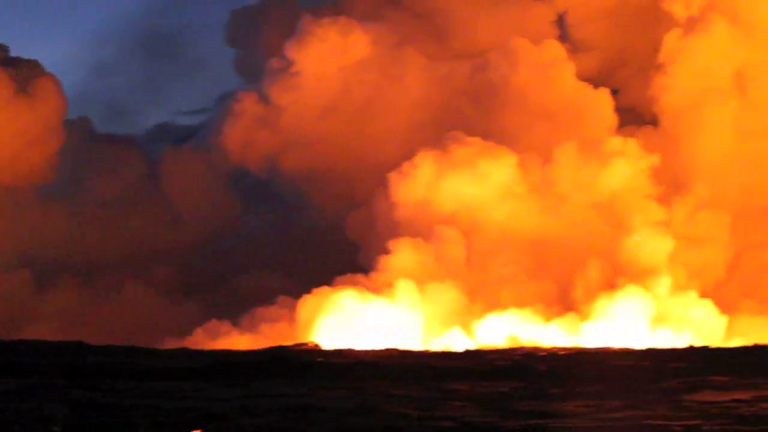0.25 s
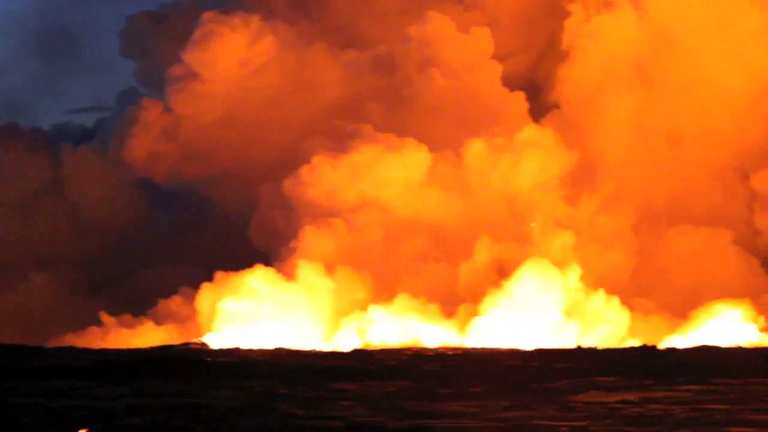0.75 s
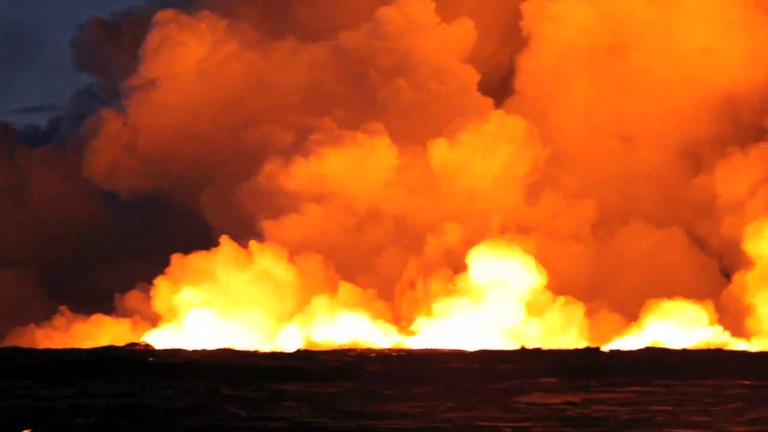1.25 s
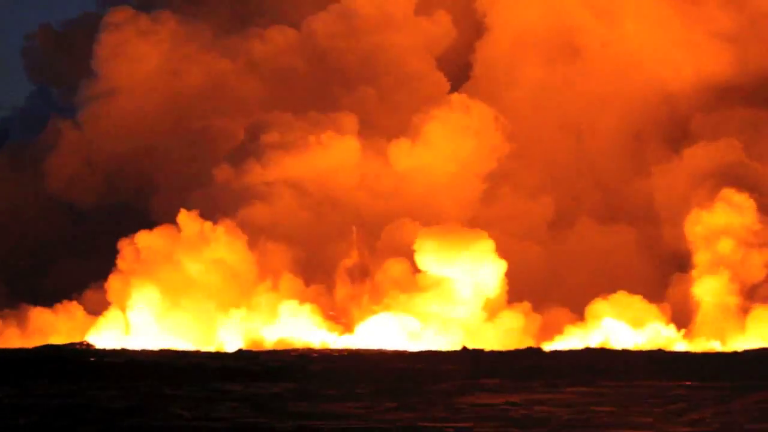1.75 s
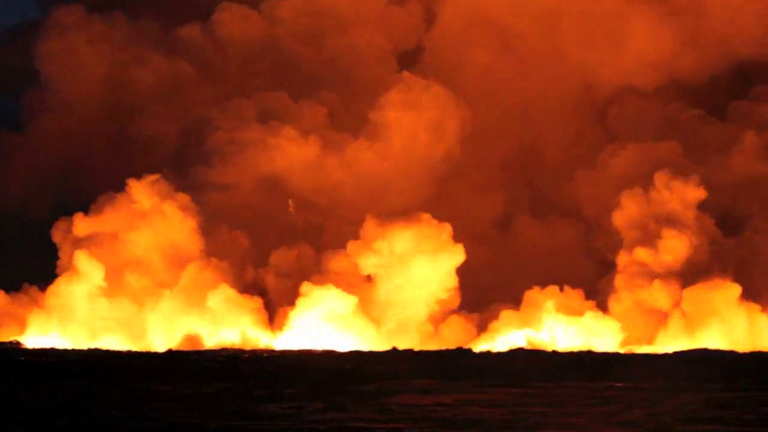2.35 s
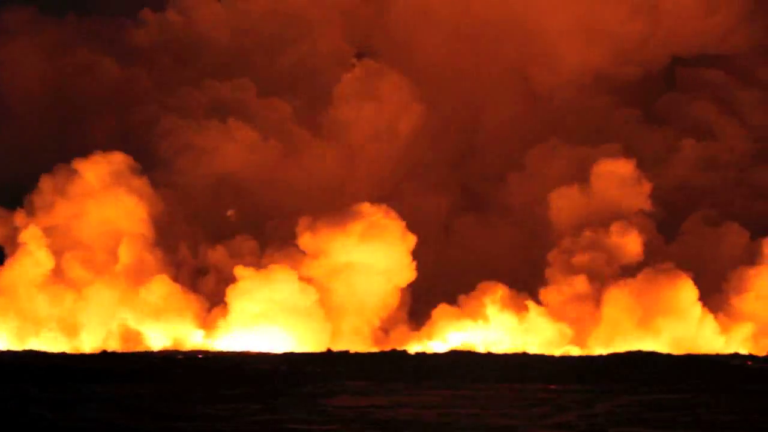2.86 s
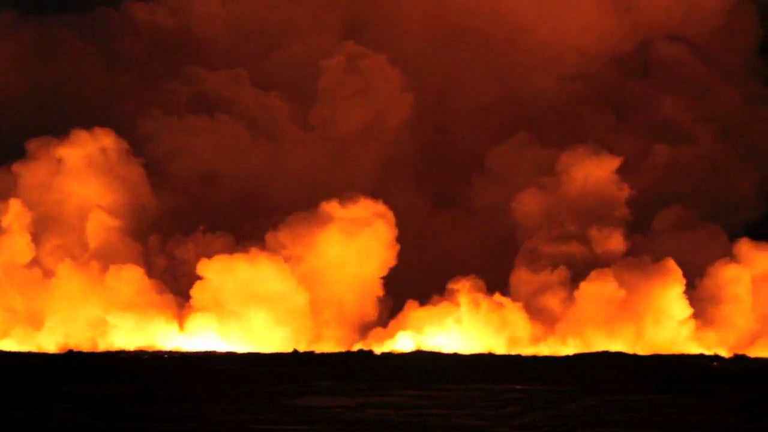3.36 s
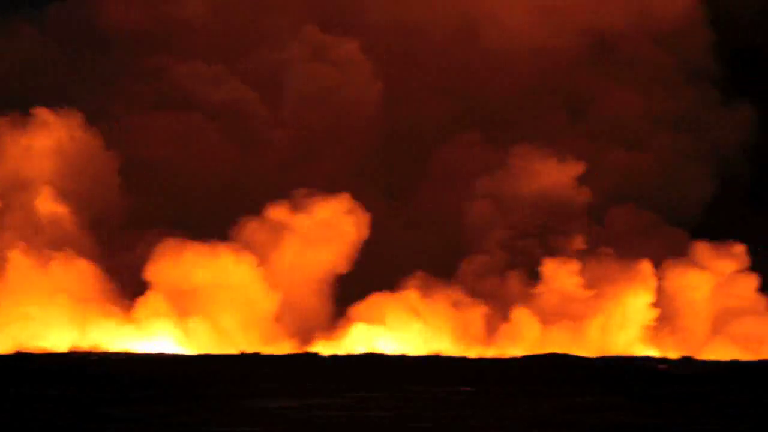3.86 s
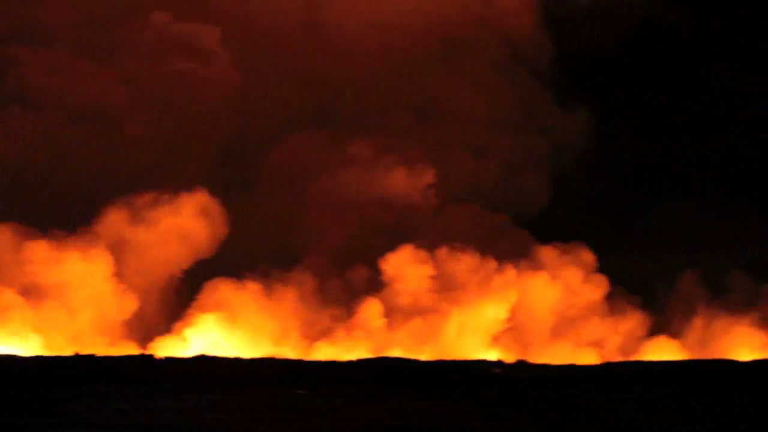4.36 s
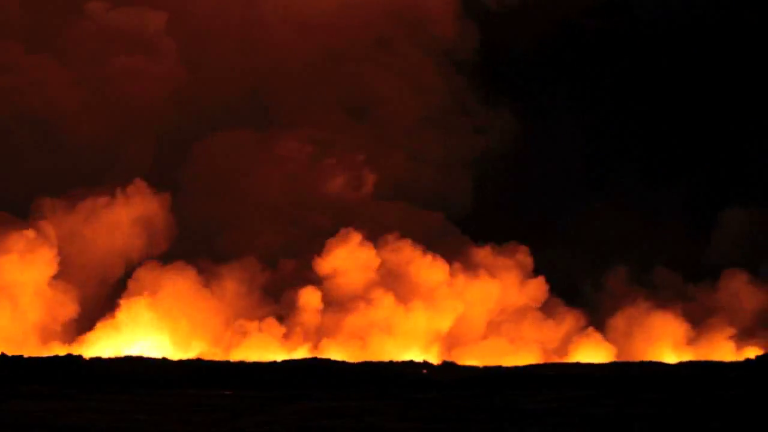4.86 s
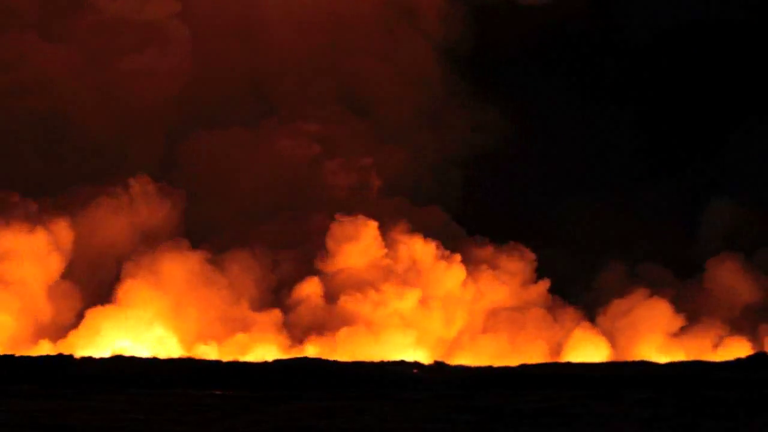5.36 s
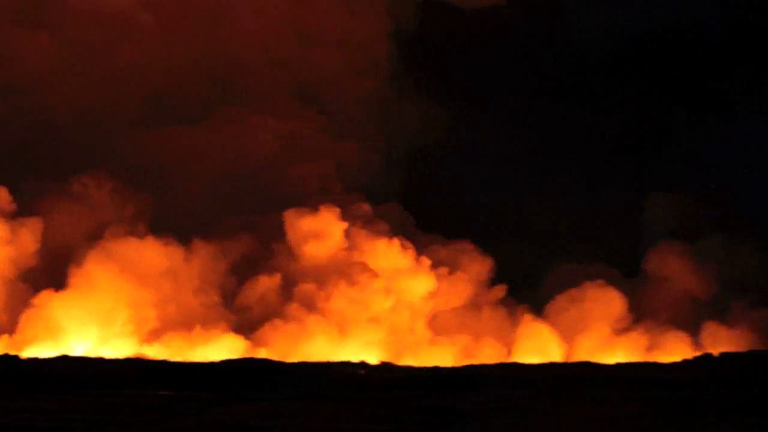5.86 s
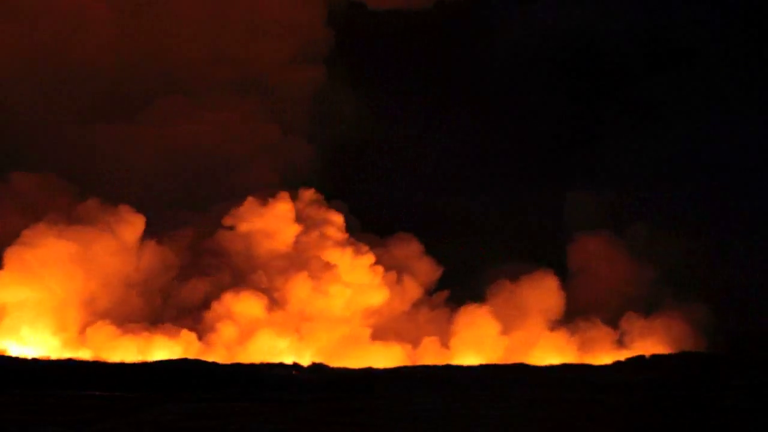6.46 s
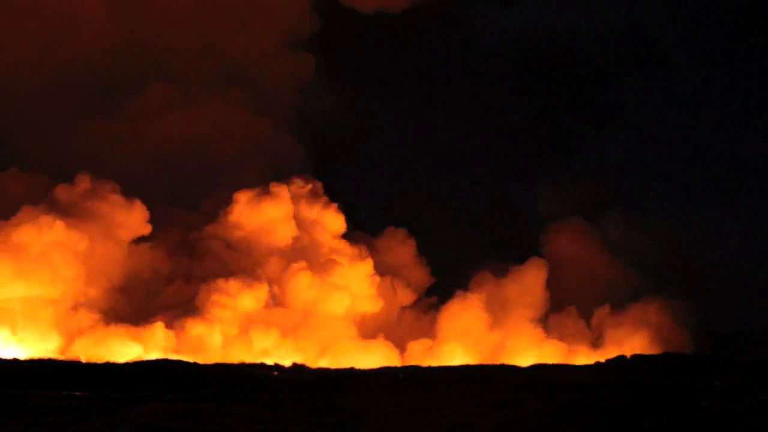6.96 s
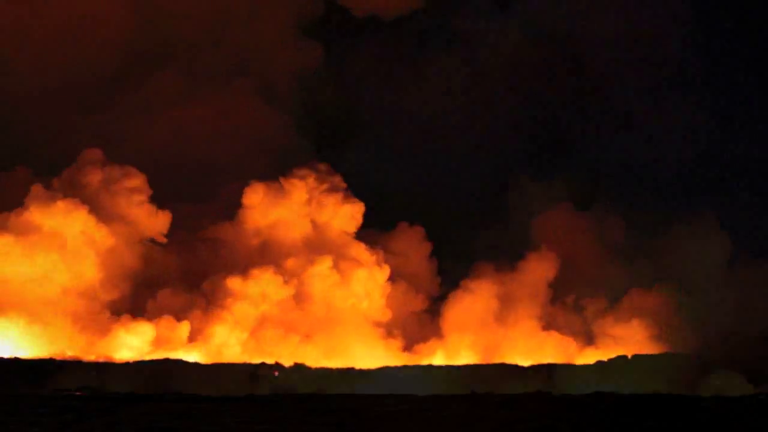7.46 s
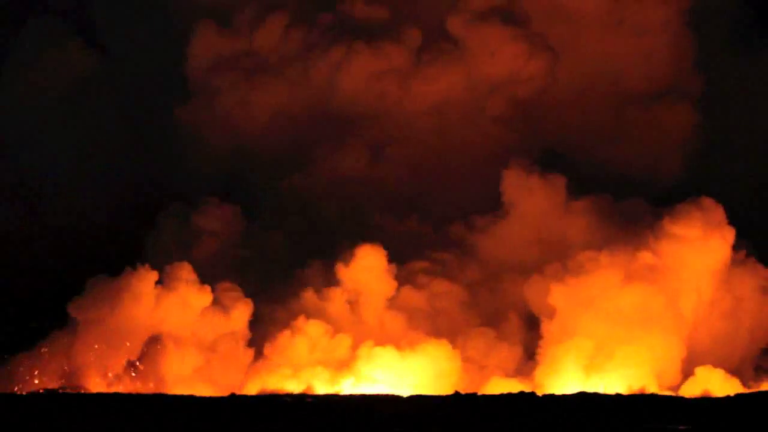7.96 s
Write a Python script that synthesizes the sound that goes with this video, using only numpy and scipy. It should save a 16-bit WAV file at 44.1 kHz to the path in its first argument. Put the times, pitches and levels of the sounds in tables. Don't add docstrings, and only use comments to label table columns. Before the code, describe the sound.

Molten lava pours into the sea at night, steam roaring and seething under constant sharp rock cracks, fine crackle and a few deep thudding blasts.

```python
import sys
import numpy as np
from scipy import signal
from scipy.fft import rfft, irfft, next_fast_len
from scipy.io import wavfile
from scipy.ndimage import uniform_filter1d

SR = 44100
rng = np.random.default_rng(int(sys.argv[2]) if len(sys.argv) > 2 else 0)


def file_out(sig):
    cols = np.atleast_2d(sig).T
    lim = np.clip(cols, -1, 1)
    pcm = np.round(lim * 32767).astype(np.int16)
    wavfile.write(sys.argv[1], SR, pcm)


def ratio_of_db(decibels):
    return 10 ** (np.asarray(decibels, float) / 20)


N = 362061

# (t/s, gain)
VOLUME = [
    (0, 1),
    (7.5, 1),
    (7.9, 1.03),
    (8.0, .568),
    (8.21, .568),
]
SPLINTER_RATTLE_DB = -28.5


def unit(x):
    return x / np.sqrt(np.mean(x ** 2))


def curve(s, value):
    return np.interp(np.arange(N) / SR, s, value)


def colour(x, table):
    hz, db = np.transpose(table)
    size = next_fast_len(N)
    f = np.maximum(np.arange(size // 2 + 1) * SR / size, 1)
    gain = ratio_of_db(np.interp(np.log(f), np.log(hz), db))
    return unit(irfft(rfft(x, size) * gain, size)[:N])


def walk(rate):
    k = int(SR / rate)
    held = np.repeat(rng.standard_normal(N // k + 1), k)[:N]
    slewed = uniform_filter1d(uniform_filter1d(held, k), k)
    return unit(slewed - uniform_filter1d(slewed, 4 * k))


def add(out, s, sound):
    i = max(int(s * SR), 0)
    out[..., i:i + sound.shape[-1]] += sound[..., :max(N - i, 0)]


def swells(s, db, length, rise=0.91, fall=0.95):
    t = np.arange(0, N + 256, 256) / SR - s[:, None]
    width = length[:, None] * np.where(t < 0, rise, fall)
    bells = ratio_of_db(2 * db)[:, None] * np.exp(-(t / width) ** 2)
    return curve(t[0] + s[0], bells.sum(axis=0))


def seething(table, flicker_db, grains, grain_db, grain_share, count):
    hits = rng.random(N) < grains / SR
    size = ratio_of_db(grain_db * np.minimum(rng.exponential(size=N), 3.2))
    bursts = hits * rng.standard_normal(N) * size
    share = np.clip(grain_share, 0, 1)
    source = np.sqrt(1 - share) * rng.standard_normal(N) + np.sqrt(share) * unit(bursts)
    return unit(colour(source, table) * ratio_of_db(flicker_db * walk(count)))


def boiling():
    # (f/Hz, level/dB)
    rumble_tone = [(20, -21), (35, -56), (50, 3.5), (100, 1), (200, -1), (300, -12), (600, -50)]
    roar_tone = [(100, -16.5), (200, -5.5), (300, -1.5), (450, -3.5), (580, -1.5), (800, -2), (930, -8),
                 (1300, -16.5), (3000, -53)]
    seethe_tone = [(500, -15.5), (950, -4.5), (1400, 2), (1700, -1), (2100, -8), (3500, -34.5)]
    spray_tone = [(1500, -22), (2100, -2), (2700, 0), (3200, -7), (4300, -11), (6500, -20), (12000, -35)]
    # (t/s, roar level/dB)
    flow = [(0, -30), (.6, -30), (1.35, -32.5), (1.55, -30.5), (1.85, -34), (2.25, -31), (2.7, -33),
            (3.09, -29.5), (3.65, -35.5), (3.9, -34.5), (4.09, -31), (4.82, -31), (5.2, -32), (5.6, -29.5),
            (6.0, -32.5), (6.5, -33.5), (7.4, -32), (8.21, -34)]
    # (t/s, seething level/dB, length/s, spray share/dB)
    waves = [(0.0, -42, 0.15, -9), (0.534, -40.5, 0.23, -5), (0.782, -41.5, 0.14, -5),
             (2.048, -39.5, 0.22, -6.5), (2.538, -38, 0.18, -4), (2.82, -38, 0.12, -9.5),
             (3.07, -35, 0.16, -4), (3.418, -38.5, 0.15, -14), (4.253, -34, 0.14, -5.5),
             (4.5, -36, 0.61, -8.5), (4.797, -37.5, 0.25, -13), (5.13, -34.5, 0.2, -4),
             (5.6, -34, 0.16, -7), (6.01, -42, 0.41, -18), (6.827, -36, 0.15, -11), (6.976, -36, 0.17, 0),
             (7.112, -36.5, 0.1, 0.5), (7.295, -31.5, 0.13, -15), (7.72, -37.5, 0.15, -6.5),
             (7.84, -36.5, .08, -4.5), (7.502, -45, 0.14, -8), (1.2, -44, .12, -12)]
    # (t/s, rumble level/dB, length/s)
    tremors = [(0.323, -43, 0.11), (0.854, -36, 0.17), (1.8, -40.5, 0.32), (2.7, -40.5, 0.18),
               (3.85, -36.5, 0.26), (4.345, -36, 0.18), (4.646, -41, 0.2), (4.992, -27.5, 0.095),
               (5.3, -38.5, 0.15), (7.236, -31.5, 0.064), (7.89, -44, 0.059), (4.896, -26, 0.045),
               (5.1, -37, .07), (7.1, -45, 0.071), (7.34, -36, 0.062), (1.27, -37.5, .1), (3.3, -44, .1)]
    # (t/s, gain)
    wash_gain = [
        (7.9, 0.77),
        (7.945, 0.4),
        (8.21, 0.47),
    ]
    rise, fall = 0.87, 0.79
    calm_seethe_db, calm_spray_db, calm_rumble_db = -43, -47.5, -42

    s, db, length, share_db = np.transpose(waves)
    wash = np.sqrt(ratio_of_db(2 * calm_seethe_db) + swells(s, db, length, rise, fall))
    foam = np.sqrt(ratio_of_db(2 * calm_spray_db) + swells(s, db + share_db, length, rise, fall))
    shake = np.sqrt(ratio_of_db(2 * calm_rumble_db) + swells(*np.transpose(tremors)))
    rumble = seething(rumble_tone, 2.2, 300., 1.0, 0.19, count=12) * shake * ratio_of_db(2.0)
    roar = seething(roar_tone, 0.54, 900., 4.55, 0.29, count=25)
    roar = roar * ratio_of_db(curve(*np.transpose(flow)) + 2.0)
    seethe = seething(seethe_tone, 0.75, 700., 1.2, 0.34, count=24) * wash * ratio_of_db(1.5)
    spray = seething(spray_tone, 1.6, 900., 6.2, 0.32, count=30) * foam * ratio_of_db(0.3)
    volume = curve(*np.transpose(VOLUME))
    return volume * (rumble + roar) + curve(*np.transpose(wash_gain)) * (seethe + spray)


def tick(hz):
    return -23 + 12 * np.log2(hz / 4000)


def cracks(table):
    air_hz = 13400
    out, t = np.zeros((2, N)), np.arange(2048) / SR
    f = np.maximum(np.arange(1025) * SR / 2048, 1)
    noises = rng.standard_normal((len(table), 3, 2048))
    for (s, db, hz, q, tick_db, rattle_db), noise in zip(table, noises):
        r = f / hz
        ring = 1 / (1 + .6j * max(q, .3) * (r - 1 / r)) ** 2
        broad_tick = ratio_of_db(tick_db) * 1j * r / (1 + 1j * r)
        air = 1 / (1 - (f / air_hz) ** 2 + 1.3j * f / air_hz)
        body = air * (ring + broad_tick)
        blow = ratio_of_db(-24) * noise[0] * np.exp(-t / .0005)
        blow[:9] += np.hanning(11)[1:-1] ** 8 / 2.2
        rattle = ratio_of_db(rattle_db) * noise[1] * np.exp(-t / 0.0032) * np.minimum(t / 0.00098, 1)
        scatter = ratio_of_db(-38.5) * noise[2] * np.exp(-t / 0.00031)
        ports = blow + rattle + scatter * np.array([[1], [-1]])
        add(out, s, ratio_of_db(db) * irfft(rfft(ports) * body))
    return out


def crumbs():
    when, size, pitch, sharp = rng.random((400, 4)).T
    octaves = 0.56 * (2 * pitch - 1) * 2.7
    hz = 6500 * 2 ** octaves
    db = -15 + 2.5 * np.minimum(-np.log(size), 1.5)
    q = .4 + 2 * 3.8 * sharp ** 2
    rows = zip(when * 7.9, db, hz, q)
    return cracks([(*row, tick(row[2]), SPLINTER_RATTLE_DB) for row in rows])


def fragments():
    # (t/s, blow/dB, ringing f/Hz, sharpness Q)
    slabs = [(0.353, 21.5, 2000, 1.2), (0.5362, 30, 680, 2.6), (0.5361, 25.5, 1280, 3.2),
             (0.6415, 20, 1390, 6.6), (0.7614, 16.5, 2570, 5), (1.145, 17, 1390, 2.3),
             (1.353, 16.5, 2650, 16), (1.6298, 11.5, 1900, 1.54), (1.6447, 19.5, 875, 1.14),
             (1.8014, 5, 3140, 0.92), (2.488, 13.5, 1400, 1.2), (2.5204, 6.5, 1880, 0.98),
             (3.0179, 40, 684, 1.7), (3.018, 29, 2020, 3.1), (3.1183, 14.5, 830, 1.1),
             (3.5443, 4, 2530, 1.1), (3.585, 9, 1710, 6.1), (3.0178, 31.5, 1220, 2.7),
             (4.5234, 5, 2590, 1.4), (4.8756, 15.5, 830, 1.06), (5.1109, 4.5, 1900, 0.4),
             (5.9867, 17.5, 3330, 1.7), (6.2514, 3.5, 940, 0.43), (6.3777, 23, 685, 6),
             (6.7528, 6, 2400, 0.61), (6.835, 13, 2550, 1.5), (7.094, 12, 670, 3), (7.3345, 12, 1460, 1.2),
             (8.131, 20.5, 650, 2.15), (8.1305, 13.5, 2140, 2.9), (0.7623, 12, 6050, 6.9),
             (0.7617, 10, 11100, 10), (0.7625, 9, 8750, 7), (4.8932, 15.5, 2730, 7.9),
             (5.9872, 16, 5200, 12), (6.2328, 19.5, 6000, 4), (6.2336, 12, 3900, 5.6),
             (6.2328, 9, 1900, 3.3), (6.2217, 16, 2600, 2.7), (7.332, 9, 4300, 3), (0.949, 16, 630, 3),
             (1.2692, 14, 650, 3), (2.3202, 18, 630, 2.4), (4.7038, 20, 730, 3), (4.7962, 17, 650, 3.3),
             (5.8527, 16.5, 700, 4.6), (7.1083, 9, 2690, 4), (8.1393, 2, 2480, 4.5), (1.23, 4, 1900, 3),
             (0.8888, 12, 1360, 2.8)]
    # (t/s, blow/dB, ringing f/Hz, sharpness Q)
    crust = [(0.3533, 32, 3970, 3.1), (4.902, -2, 7350, 1.5), (4.9198, -4, 6350, 0.9),
             (0.5223, 0.5, 5000, 0.53), (0.7616, 15, 3980, 5.3), (0.8892, 1, 3100, 0.27),
             (0.9423, -1, 3290, 0.39), (1.5982, 7.5, 7100, 2.1), (1.8416, -1, 5270, 0.3),
             (2.2057, 3.5, 3030, 0.73), (3.2247, 0, 4340, 0.4), (3.5182, 7, 6500, 1.6),
             (3.8411, 2, 2720, 0.38), (3.8454, 8, 2820, 3.7), (4.2218, 13, 8800, 4.2),
             (4.3371, 6, 3540, 1.6), (4.4335, 12, 8440, 3.6), (4.8928, 30, 5350, 2.9),
             (5.0749, 4, 2960, 2.6), (5.2273, 9, 3230, 1.3), (5.701, 8, 5500, 0.5),
             (5.9866, 28.5, 5400, 3.6), (6.222, 13.5, 5600, 0.99), (0.7626, 11.5, 3500, 2.2),
             (6.2329, 11, 4800, 0.6), (6.6491, 1.5, 7080, 0.5), (6.766, 3, 5100, 0.25),
             (7.1153, 4.5, 6750, 0.72), (7.3283, 6, 8000, 0.92), (6.2216, 23, 11000, 3.8)]
    # (t/s, blow/dB, ringing f/Hz)
    splinters = [(0.1435, -4, 7380), (0.6295, -3, 4370), (0.7267, 2, 2600), (1.1678, -3, 2400),
                 (1.1747, 1.5, 2860), (1.209, -1.5, 3290), (1.6108, -8, 7340), (1.796, -1.5, 10320),
                 (1.8647, -1, 6650), (1.8862, -2, 7480), (1.9467, -0.5, 4190), (2.082, 2.5, 2230),
                 (2.5835, 1.5, 2160), (3.066, -0.5, 6000), (3.911, -2, 2680), (4.0335, -3, 6000),
                 (4.4783, 0, 3050), (4.6004, -0.5, 3950), (4.697, 0.5, 3000), (4.886, -1, 7800),
                 (5.1167, 0, 7000), (5.2402, -3, 4430), (5.3098, 0, 4530), (6.024, 0, 5890),
                 (6.1177, -3.5, 8150), (6.4253, -2, 6000), (6.597, 0.5, 1920), (7.1921, -4, 10800),
                 (7.4835, -0.5, 3260), (7.391, 3, 3500)]
    slab_tick_db, slab_rattle_db = -37.5, -28
    crust_rattle_db, splinter_q = -45, 1.06
    return (cracks([(*row, slab_tick_db, slab_rattle_db) for row in slabs])
            + cracks([(*row, tick(row[2]), crust_rattle_db) for row in crust])
            + cracks([(*row, splinter_q, tick(row[2]), SPLINTER_RATTLE_DB) for row in splinters])
            + crumbs())


def booms():
    # (t/s, peak level/dB, f/Hz, length/ms)
    blasts = [(0.163, -23, 146, 15), (0.353, -37, 159, 22), (0.797, -21.5, 144, 29),
              (0.892, -23, 102, 19.0), (1.057, -26, 115, 13), (1.643, -27.5, 192, 49),
              (1.862, -37, 103, 13), (1.919, -16, 146, 8.8), (2.786, -23, 194, 32), (3.02, -31, 126, 17),
              (3.198, -24, 108, 15), (3.776, -37, 127, 17), (3.983, -33.5, 160, 18), (4.381, -23, 173, 35),
              (4.881, -18, 82, 12), (4.924, -12.5, 103, 53), (5.012, -17, 108, 9.2), (5.057, -10, 125, 23),
              (5.107, -19, 97, 22), (5.149, -22, 106, 12), (5.06, -18, 62, 43), (5.27, -21, 81.6, 32),
              (4.9, -15, 55, 37), (7.054, -24, 110, 8.5), (7.219, -23, 111, 12), (7.307, -30, 116, 13),
              (7.368, -16.5, 106, 11)]
    out, t = np.zeros(N), np.arange(-3000, 6000) / SR
    for (s, db, hz, ms), turn in zip(blasts, rng.random(len(blasts))):
        width = ms * 0.00038 * np.where(t < 0, 1.3, .8)
        phase = 2 * np.pi * (hz * (t - 2.3 * t ** 2) + turn)
        add(out, s - 3000 / SR, ratio_of_db(db - 0.5) * np.exp(-(t / width) ** 2) * np.sin(phase))
    return out


def jets():
    # (t/s, rms level/dB, centre f/Hz, decay/ms)
    puffs = [
        (0.357, -13, 3880, 6.1),
        (0.765, -33, 5000, 6),
        (3.02, -37, 1800, 8),
        (4.0773, -21, 1200, 4),
        (5.0746, -24, 3000, 5),
        (5.988, -26, 5000, 4),
        (6.233, -19, 6500, 3.5),
        (7.1152, -34, 6000, 6),
        (7.3342, -35, 2500, 4.5),
        (8.132, -29, 1790, 9),
    ]
    rise_ms, q, side_db = 3.4, 1, -21
    out, t = np.zeros((2, N)), np.arange(4096) / SR
    f = np.maximum(np.arange(2049) * SR / 4096, 1)
    for (s, db, hz, ms), noise in zip(puffs, rng.standard_normal((len(puffs), 2, 4096))):
        band = unit(irfft(rfft(noise) / (1 + 1j * q * (f / hz - hz / f)) ** 2))
        ports = band[0] + ratio_of_db(side_db) * band[1] * np.array([[1], [-1]])
        swell = np.minimum(1000 * t / rise_ms, 1) * np.exp(-1000 * t / ms)
        add(out, s, ratio_of_db(db) * ports * swell)
    return out


def chips():
    # (t/s, peak level/dB, ringing f/Hz)
    high = [(0.6694, -27, 8780), (0.7976, -27, 9610), (1.058, -29, 9750), (1.1333, -25, 9170),
            (1.5115, -27, 10600), (1.9021, -24, 12300), (3.0704, -33, 8700), (3.4426, -26, 10900),
            (3.6785, -30, 9970), (3.7534, -33, 10500), (3.8157, -28, 11000), (3.93, -36, 10580),
            (4.0003, -33, 9520), (4.151, -29, 9860), (4.3504, -24, 12000), (4.994, -27, 9790),
            (5.0335, -23, 10800), (5.0908, -27, 10200), (5.249, -26, 9150), (5.9444, -29, 8570),
            (6.2394, -31, 10700), (6.3724, -28, 10200), (6.7734, -32, 10600), (6.8798, -28, 9830),
            (6.8992, -32, 11800), (7.0964, -24, 11100), (7.3044, -28, 11400), (7.5443, -27, 10300),
            (7.5564, -34, 11200), (7.6625, -35, 11000)]
    middle = [(0.134, -26, 3510), (0.3664, -25, 4200), (0.5791, -30, 5000), (0.839, -27, 4390),
              (1.0056, -22, 4330), (1.0804, -26.5, 4170), (1.4052, -27, 3580), (1.5384, -26, 4970),
              (1.7818, -29, 3670), (2.5052, -28, 3540), (2.7397, -26, 4050), (3.2344, -28, 3710),
              (3.4765, -28, 3800), (3.5773, -25, 3930), (4.0771, -24, 3580), (4.2053, -20, 3800),
              (4.3789, -22, 3620), (4.5625, -27, 5320), (5.4869, -31, 3510), (5.6111, -27, 3970),
              (6.1244, -32, 4150), (7.457, -26, 3960), (7.5353, -24, 4470), (7.7987, -29, 4110)]
    lag_s, q = .0012, 2.5
    rows = []
    for table, gain_db in ((high, 18), (middle, 21.5)):
        for s, db, hz in table:
            rows.append((s + lag_s, db + gain_db, hz, q, tick(hz) - 6, SPLINTER_RATTLE_DB))
    return cracks(rows)


def needles():
    # (t/s, blow/dB)
    snaps = [(0.4816, -9), (0.595, -6), (0.6605, -6), (0.9925, -8), (1.3158, -6), (1.5744, -5),
             (1.6673, -10), (1.742, -10), (2.101, -7), (2.1275, -11), (2.3468, -11), (2.4339, -4.5),
             (2.8958, -7), (2.9256, -11), (3.1985, -6), (3.746, -10), (3.9943, -4), (4.5593, -5),
             (4.71, -7), (4.8727, -16), (5.2183, -8), (5.64, -11), (5.873, -17), (6.0557, -10),
             (6.494, -7.5), (7.084, -3), (7.1674, -15), (7.2909, -4), (7.4894, -12), (7.6957, -22)]
    hz, q = 6700, 1
    return cracks([(*row, hz, q, tick(hz), SPLINTER_RATTLE_DB) for row in snaps])


def mist():
    # (f/Hz, level/dB)
    mist_tone = [(2000, -7), (3500, 6.5), (5500, 6.5), (9000, -1), (16000, -12)]
    volume = curve(*np.transpose(VOLUME))
    fizz = seething(mist_tone, 1.5, 600., 4.0, .55, count=28)
    return np.sqrt(volume) * ratio_of_db(-51 + 1.5) * fizz


def scene():
    return boiling() + fragments() + booms() + jets() + chips() + needles() + mist()


def top_cut(x):
    return signal.sosfilt(signal.butter(12, 15710, fs=SR, output="sos"), x)


def record(dry):
    # (f/Hz, level/dB)
    hiss_tone = [(20, -6), (70, -33), (150, -18), (1400, -5.5), (2200, -3), (6000, -2.5), (12000, -7.5),
                 (15000, -5), (20000, -17)]
    # (f/Hz, width/Hz, level/dB)
    housing = [
        (7800, 1630, -9),
        (11060, 2200, 3),
        (965, 81, -5),
    ]
    offset = (-.454, -.095)
    volume = curve(*np.transpose(VOLUME))
    hiss = np.array([colour(rng.standard_normal(N), hiss_tone) for _ in range(2)])
    x = dry + np.sqrt(volume) * ratio_of_db(-45.5) * hiss
    for hz, width, db in housing:
        w, g = 2 * np.pi * hz / SR, ratio_of_db(db / 2)
        k = np.sin(w) * width / hz / 2
        top = [1 + k * g, -2 * np.cos(w), 1 - k * g]
        bottom = [1 + k / g, -2 * np.cos(w), 1 - k / g]
        x = signal.lfilter(top, bottom, x)
    x = signal.sosfilt(signal.butter(N=4, Wn=14500., fs=SR, output="sos"), x)
    x = x + volume * np.array(offset)[:, None]
    peak = np.maximum(np.abs(x).max(axis=0), 1)
    need = np.clip((1 / peak) ** .6, .84, 1)
    climb = .9 / SR * uniform_filter1d(np.arange(N) // 1024 * 1024., 300)
    gain = np.minimum(np.minimum.accumulate(need - climb) + climb, 1)
    x = np.clip(x * uniform_filter1d(gain, size=60, origin=29), -1, 1)
    return top_cut(x)


dry = scene()
out = record(dry)
file_out(out)
```